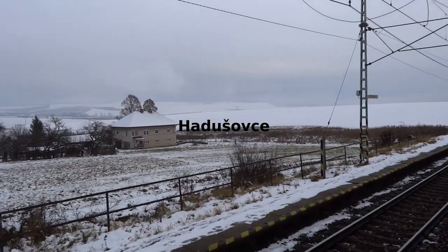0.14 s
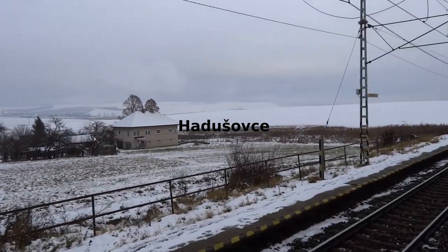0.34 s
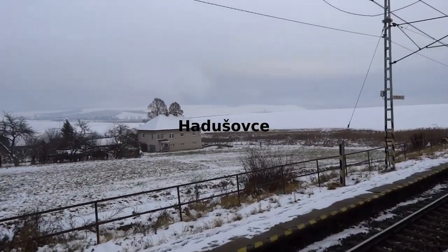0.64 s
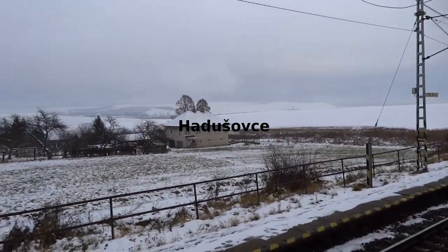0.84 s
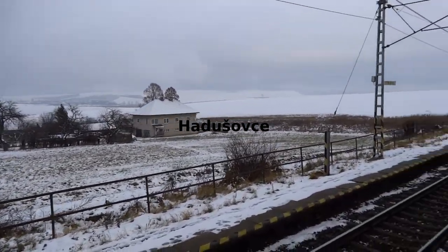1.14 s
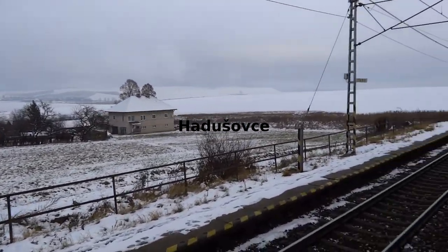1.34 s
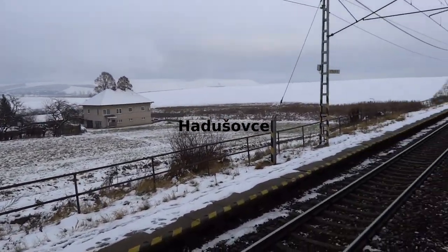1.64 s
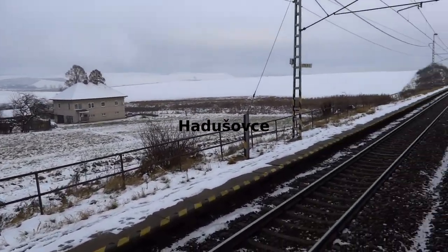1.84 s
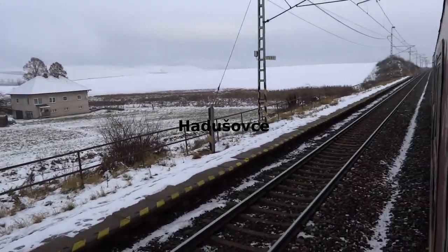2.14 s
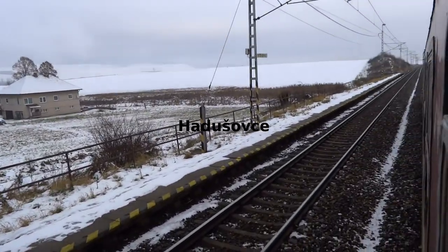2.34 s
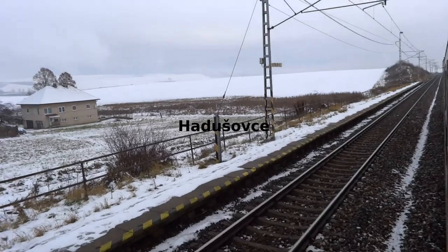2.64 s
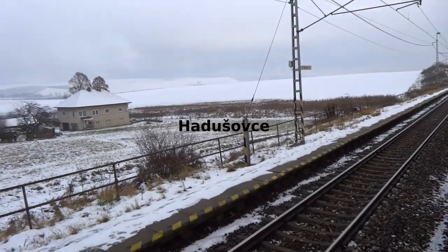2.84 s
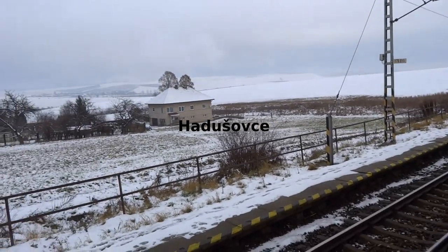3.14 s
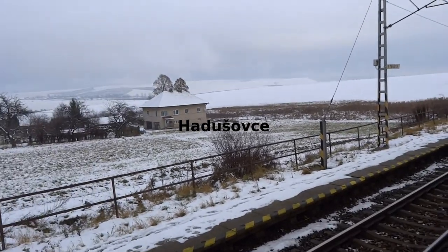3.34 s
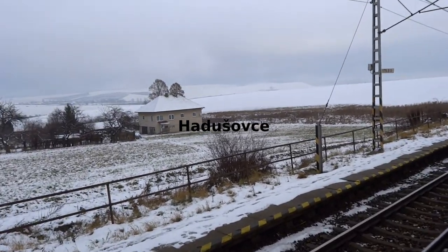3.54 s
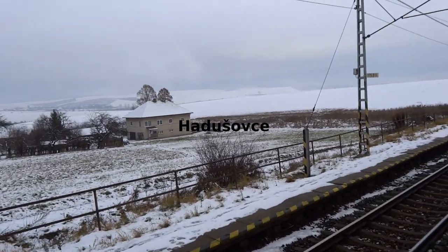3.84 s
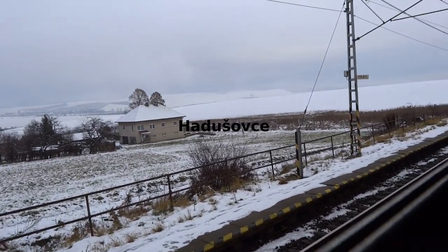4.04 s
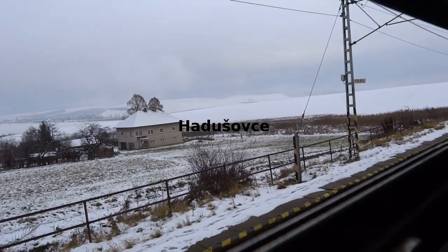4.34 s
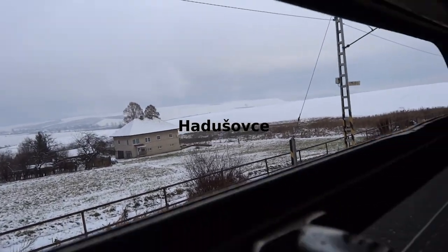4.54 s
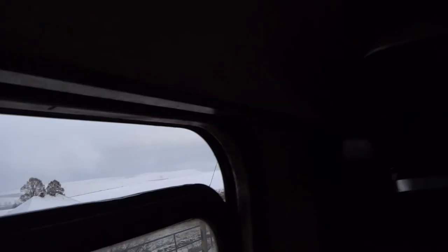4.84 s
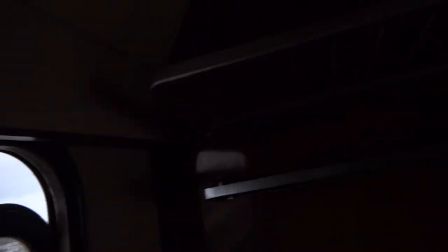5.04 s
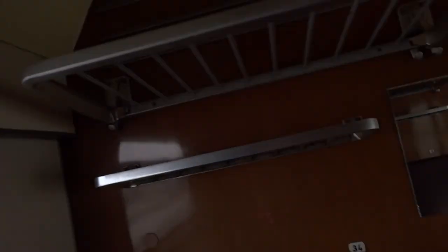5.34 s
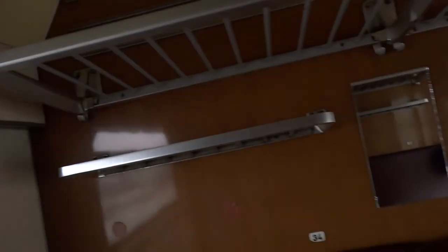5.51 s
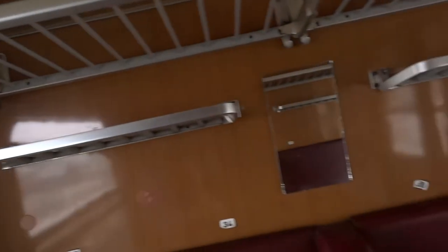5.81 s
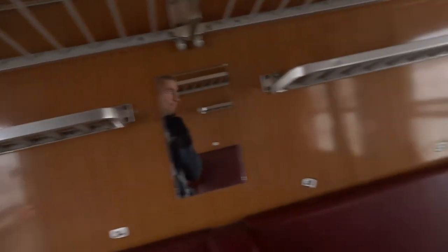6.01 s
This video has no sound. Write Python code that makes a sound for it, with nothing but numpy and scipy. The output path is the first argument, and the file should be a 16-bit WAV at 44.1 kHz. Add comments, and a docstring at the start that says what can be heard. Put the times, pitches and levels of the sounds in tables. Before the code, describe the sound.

A loud shrill brake squeal with grinding and groans breaks up as a train halts, followed by a bright air hiss, frame knock and faint murmur.

```python
"""Train wheels squeal under their brake blocks as a passenger train stops, heard from an open carriage window.
Friction drives beating wheel tones, which falter and break into pulses before the stop; noise and resonances
make the grinding, rough sliding tones the groans, and short gliding tones the cries of the blocks and brief
flares of the wheels. Then coloured noise and fluttering whistles make the compressed air hiss out of the
brakes, ringing modes knock on the window frame, and the compartment hums quietly."""
import sys
import numpy as np
from scipy import signal
from scipy.fft import rfft, irfft
from scipy.io import wavfile
from scipy.ndimage import uniform_filter1d, minimum_filter1d, map_coordinates

SR = 44100
rng = np.random.default_rng(int(sys.argv[2]) if len(sys.argv) > 2 else 0)


def waveform_to_disk(signal):
    """Save audio, clipped to [-1, 1], as 16-bit WAV at the path in sys.argv[1]."""
    frames = np.transpose(np.atleast_2d(signal))
    scaled = np.clip(frames, -1, 1) * 32767
    samples = np.round(scaled).astype(np.int16)
    wavfile.write(sys.argv[1], SR, samples)


N = 272097
TIME = np.arange(N) / SR
BINS = np.maximum(np.fft.rfftfreq(N, 1 / SR), 1)   # Hz

# The braking train. Each row: time in seconds, speed as a share of full speed.
SPEED = [(0, 0.94), (1, 0.71), (1.7, 0.41), (2.1, 0.23), (2.8, 0.111), (3.1, 0.048)]
STOP_S, STOP_FADE_S = 3.15, 0.043

# Pitch of the leading wheel mode. Each row: time in seconds, frequency in Hz.
SQUEAL_PITCH = [(0, 4725), (2, 4740), (2.6, 4733)]
# Its place shifts as the microphone turns. Each row: time in seconds, left minus right in dB.
SQUEAL_LEFT = [(0, 1.5), (1.3, 5.4), (2.2, 5), (2.8, 3)]
# Leading wheel mode, its octave, its twelfth (trimmed later) and the mode just below it.
# Each row: level at full speed in dB, level at a crawl in dB, release in seconds, fall in dB per second.
SQUEAL_MODES = [(-16.5, -12.5, 2.733, 109), (-41.5, -31, 2.79, 212), (-37, -39, 2.88, 120),
                (-18.5, -29.5, 2.75, 100)]
LOWER_HZ = 4499   # the wheel mode just below the leading one
# High wheel modes. Each entry: frequency in Hz.
WHISTLE_HZ = [8085, 9159, 10273, 12152]
# Their levels. Each row: level at full speed in dB, level at a crawl in dB, release in seconds,
# fall in dB per second, depth of the slow swing in dB.
WHISTLE_LEVELS = [(-52, -34, 2.27, 35, 1), (-73, -28, 2.21, 61, -10), (-47.5, -31.5, 2.65, 40, 0),
                  (-36, -54, 2.8, 31, 3)]
SWING_S, SWING_TOP_S = 0.402, 1.82   # period of the swing, and one of its tops
# Dips in the blocks' grip. Each row: centre in seconds, length in seconds, depth from 0 to 1.
FALTERS = [(0.026, 0.039, 0.32), (0.762, .025, 0.1), (0.799, 0.039, 0.65), (1.043, 0.02, 0.54),
           (1.131, 0.056, 0.6), (1.284, 0.13, 0.4), (1.438, 0.1, 0.48), (1.5, 0.035, 0.54),
           (1.57, 0.023, 0.71), (1.613, 0.036, 0.55), (1.656, 0.041, 0.17), (1.728, 0.066, 0.71),
           (1.793, 0.017, 0.7), (1.85, 0.075, 0.77), (2.009, 0.051, 0.73), (2.125, 0.043, 0.71),
           (2.25, 0.078, 0.89), (2.38, 0.16, 0.42), (2.447, 0.026, 0.46), (2.543, 0.067, 0.62),
           (2.688, 0.09, 0.76), (2.75, 0.063, 0.77), (2.822, 0.021, 0.68), (2.877, 0.018, 0.9),
           (2.95, 0.068, 0.8)]
UNREST_DB, UNREST_PER_S = 5, 20   # random swelling of the wheel modes

# Ringing of the brake rigging, before its trim. Each row: time in seconds, level in dB.
RINGING_LEVEL = [(0.0, -22), (0.24, -25.5), (0.57, -29), (0.61, -25), (0.77, -19.5), (0.89, -27.5),
                 (1.02, -21), (1.63, -31), (1.79, -30), (1.83, -26), (2.07, -31.5), (2.11, -25),
                 (2.52, -36), (2.64, -28), (2.68, -30.5), (2.85, -37.5), (3.12, -34.5)]
# Rasp of the blocks on the treads, before its trim. Each row: time in seconds, level in dB.
RASP_LEVEL = [(0.0, -33.5), (0.28, -37.5), (0.37, -33.5), (0.61, -36.5), (0.77, -33.5), (0.89, -37),
              (1.14, -36.5), (1.18, -36.5), (1.5, -34.5), (1.63, -37.5), (1.87, -32.5), (1.91, -37.5),
              (2.23, -35), (2.32, -37.5), (2.76, -38), (2.84, -38.5), (3.09, -40), (3.12, -44.5)]
RINGING_TRIM_DB, RASP_TRIM_DB = -6, 0.52
# Brake rigging resonances. Each row: frequency in Hz, width in Hz before narrowing, relative level in dB.
RIGGING = [(876, 27, -16.5), (1360, 56, -10.5), (2075, 52, -1), (2639, 43, 1.5), (3360, 37, 0.5),
           (3450, 72, -4), (3916, 70, -4), (4130, 130, -1.5)]
# Faint upper wheel resonances. Each row: frequency in Hz, width in Hz, relative level in dB.
SHIMMER = [(6070, 42, 0.5), (6795, 100, 1.5), (7300, 120, 2.5), (8050, 64, 0.5), (11560, 130, 2),
           (12100, 80, 1), (12540, 140, 4)]
# Colour of the rasp. Each row: frequency in Hz, relative level in dB.
RASP_COLOUR = [(300, -40), (700, 1), (1200, -6), (1800, 5.5), (3000, 7), (4300, 5), (5100, 9), (5900, 1),
               (7600, 1), (9500, 4), (11500, 2), (13500, -1), (15000, -2)]
# Colour of the wheels rolling. Each row: frequency in Hz, relative level in dB.
ROLLING_COLOUR = [(30, -56), (100, -50), (160, -58), (260, 0), (400, 1), (560, -2.5), (750, -5.5),
                  (1200, 3), (3000, -66)]
ROLL_DB, ROLL_SPEED_DB = -57, 7.5   # roll at a standstill, and its rise up to full speed

# Low groans, before their trim. Each row: time in seconds, level in dB.
GROAN_LEVEL = [(0, -40), (1.2, -42), (1.7, -38), (2.2, -38), (2.7, -37), (3.0, -45.5)]
GROAN_TRIM_DB = -5
# Modes of the groans. Each row: frequency in Hz, relative level in dB.
GROAN_MODES = [(340, -5), (480, 0.5), (660, -1.5), (895, 10.5), (1030, 6), (1400, 1.5), (1700, 4),
               (2030, 3.5)]
# Single blocks catch and cry out, and wheel modes flare briefly. Each row: start in seconds, length in seconds,
# middle pitch in Hz, # glide from start to end in Hz, level in dB.
CRIES = [(0, 0.07, 3500, 8, -32), (0, 0.09, 817, -14, -42), (.02, 0.15, 2083, 6, -37),
         (.03, 0.12, 2650, 0, -35), (0.156, 0.061, 816, -3, -33), (.18, .07, 3890, 0, -30),
         (0.272, 0.056, 2633, 0, -27.5), (0.32, 0.4, 825, 7, -32), (.4, .26, 5540, 0, -39),
         (0.47, 0.15, 3910, 13, -26), (0.46, 0.14, 3100, -6, -35), (0.61, 0.068, 9500, -3, -27),
         (0.641, .045, 3915, 0, -29), (0.738, 0.043, 2092, 2, -29.5), (0.71, 0.046, 3455, 0, -25),
         (0.738, 0.13, 3370, -21, -28), (0.77, 0.14, 827, -23, -33), (0.789, 0.08, 3080, -10, -31),
         (0.925, 0.13, 12100, -5, -29), (.98, 0.22, 2666, 3, -31.5), (1.054, 0.16, 2087, -11, -31.5),
         (1.018, 0.055, 3370, -2, -39), (1.111, 0.1, 6160, -15, -33), (1.159, 0.038, 8060, -9, -28.5),
         (1.289, 0.054, 2080, -2, -31), (1.512, 0.077, 2100, -2, -29), (1.62, 0.31, 9490, -2.5, -23.5),
         (1.66, 0.097, 1365, 6, -39), (1.696, 0.078, 6200, -3, -33), (1.737, 0.023, 2620, -2, -22),
         (1.725, 0.043, 3345, 0, -33), (1.799, 0.077, 2612, 0, -26), (1.828, 0.036, 8020, 4, -24),
         (1.827, .05, 2088, 0, -32), (1.825, 0.045, 1435, -60, -35), (1.84, 0.072, 852, 0, -35.5),
         (1.95, 0.073, 866, 12, -33.5), (2.026, 0.076, 546, -36, -40), (2.102, 0.062, 1450, 15, -38),
         (2.126, 0.065, 1960, -30, -34), (2.14, 0.076, 12000, 0, -28), (2.199, 0.058, 3360, -30, -34),
         (2.19, 0.1, 4090, -10, -33), (2.19, 0.056, 815, -40, -36), (2.24, 0.12, 2070, 30, -51),
         (2.24, 0.23, 9630, 10, -40), (2.25, 0.12, 9100, 0, -32), (2.27, 0.13, 2660, -15, -33),
         (2.321, 0.053, 1187, 23, -39.5), (2.351, 0.067, 935, -34, -27.5), (2.361, 0.061, 1880, -20, -26.5),
         (2.35, 0.059, 3990, -15, -30), (2.413, 0.063, 864, -33, -34.5), (2.434, 0.042, 2530, -22, -31),
         (2.444, 0.04, 1720, -20, -36), (2.56, 0.11, 2564, -3, -29), (2.563, 0.065, 4400, 0, -31),
         (2.532, 0.099, 7270, 9.5, -31.5), (2.575, 0.11, 2180, 5, -33.5), (2.544, 0.21, 1328, 14, -39),
         (2.69, 0.09, 775, 27, -41), (2.663, 0.11, 8740, 8, -39), (2.684, 0.091, 3975, -10, -38),
         (2.705, 0.069, 4490, -5, -18.5), (2.723, 0.11, 9490, -8, -31), (2.735, 0.078, 1505, 0, -40),
         (2.859, 0.082, 910, 11, -34), (2.865, 0.068, 1840, 34, -36), (3.127, 0.25, 4540, 2, -47.5)]

# Bumps of the running gear. Each row: start in seconds, length in seconds, level in dB.
BUMPS = [(0, 0.062, -55), (.2, 0.09, -59), (.32, 0.14, -53), (.5, 0.082, -52), (.74, 0.12, -60),
         (1.18, 0.12, -58), (1.63, 0.071, -58)]
# Colour of the bumps. Each row: frequency in Hz, relative level in dB.
BUMP_COLOUR = [(25, -30), (70, -8), (120, -8), (160, 3), (220, 2), (300, -27), (500, -32), (1500, -52)]
# The coach settles on its springs. Each row: start in seconds, length in seconds, level in dB.
SETTLE = [(3.06, 0.15, -54), (3.17, 0.16, -50.5)]
# Colour of the settling. Each row: frequency in Hz, relative level in dB.
SETTLE_COLOUR = [(25, -32), (70, -9), (130, -17), (270, -5), (400, -8.5), (1500, -25.5)]

# Pipe tone, jet and finest spray of the air. Each row: top level in dB, swell up to the top in dB,
# sag in dB per second, seep before in dB, seep after in dB.
AIR_PARTS = [(-36, 2.5, 11, -53.5, -53.5), (-35, 14.5, 2, -56, -49.5), (-36, 7, 10.5, -54, -60)]
VALVE_OPEN_S, VALVE_ATTACK_S, VALVE_TOP_S = 3.47, 0.08, 3.85
VALVE_CLOSE_S, VALVE_FALL_DB_PER_S = 4.577, 31
# Colour of the pipe tone. Each row: frequency in Hz, relative level in dB.
PIPE_COLOUR = [(280, -35), (420, -7), (640, -9), (850, -36), (1280, -43), (1550, -8.5), (1750, -5),
               (2300, -2.5), (2900, 5), (3600, 3), (4300, 4.5), (4900, -2.5), (5800, -8), (8000, -59)]
# Colour of the jet. Each row: frequency in Hz, relative level in dB.
JET_COLOUR = [(3000, -20), (4600, 2), (5400, -3), (7200, 6), (7600, 0.5), (8500, 6), (10000, 5.5),
              (11200, 5), (12500, -19), (15000, -7.5)]
# Colour of the spray. Each row: frequency in Hz, relative level in dB.
SPRAY_COLOUR = [(9000, -51), (11000, 8), (12000, 2), (13500, 9), (14500, 0), (15300, -2)]
# Air pipe resonances. Each row: frequency in Hz, width in Hz, lift in dB.
AIR_PEAKS = [(1811, 170, 15), (3076, 230, 7.5), (3220, 54, 6), (4460, 120, 3.5), (5500, 190, 6),
             (6630, 180, 6.5), (9920, 250, 8), (12400, 500, 10)]
# The microphone draws back from the window. Each row: time in seconds, share inside from 0 to 1.
INSIDE = [(4.5, 0), (5.2, 1)]
# How the compartment colours the hiss. Each row: frequency in Hz, gain in dB.
COMPARTMENT = [(1500, 5.5), (2400, 6), (3000, 2), (3300, -0.5), (3600, -1), (4300, 5.5), (5050, -2),
               (5480, 9), (6000, 5), (7000, 2.5), (10000, -2.5), (13500, 4.5)]
# Half-whistles in the escaping air. Each row: start in seconds, length in seconds, pitch in Hz, level in dB.
AIR_WHISTLES = [(3.483, 0.083, 2970, -37.5), (3.55, 0.65, 4020, -47), (3.615, 0.51, 3020, -37),
                (3.76, .22, 4250, -42), (4.222, .42, 4450, -46.5)]
AIR_FLUTTER_PER_S = 70
# A thin leak as the train comes to rest. Each row: start in seconds, length in seconds, level in dB.
LEAK = [(2.95, 0.6, -48.5)]
# Colour of the leak. Each row: frequency in Hz, relative level in dB.
LEAK_COLOUR = [(1000, -17), (2000, -22), (2600, -4.5), (3000, -11), (3600, -19), (6000, -38)]

# Contacts on the window frame. Each row: time in seconds, strength in dB.
KNOCKS = [(4.2109, -30), (4.2132, -18.5), (4.2152, -29.5), (4.2168, -30), (5.281, -46), (5.295, -48)]
# Window frame modes. Each row: frequency in Hz, level in dB, time to decay by 60 dB in seconds.
FRAME = [(197, -22, 0.14), (400, -15, 0.014), (600, -13.5, 0.016), (790, -11.5, 0.018), (1070, -5.5, 0.012),
         (1410, 3, 0.008), (1625, 1.5, 0.024), (2260, -5, 0.01), (3140, -5, .01), (4240, 0.5, 0.0074),
         (6700, 4, 0.0037), (9400, -3, .005)]
ROOM_T60_S, ROOM_DB, ROOM_DULL_HZ = 0.26, 2.5, 1050
# A sleeve brushes the frame. Each row: start in seconds, length in seconds, level in dB.
BRUSH = [(5.275, 0.067, -49)]
# Colour of the brushing. Each row: frequency in Hz, relative level in dB.
BRUSH_COLOUR = [(120, -17), (300, -5), (600, 0), (1500, -6), (3500, -12), (9000, -24)]

# Murmur of the standing carriage, before its trim. Each row: time in seconds, level in dB.
VENT_LEVEL = [(3.2, -57.5), (3.5, -49.5), (3.85, -67), (4.6, -54.5), (5.2, -50), (6.17, -47)]
VENT_TRIM_DB = 3
# Colour of the murmur. Each row: frequency in Hz, relative level in dB.
VENT_COLOUR = [(60, -32), (170, -3), (300, -5), (550, -3), (900, -7.5), (1400, -10.5), (2000, -16.5),
               (4000, -7)]
# Hum lines. Each row: frequency in Hz, relative level in dB.
HUM = [(121, -8), (139, -5)]
# Colour of the rumble. Each row: frequency in Hz, relative level in dB.
RUMBLE_COLOUR = [(15, 6), (30, -6), (60, -14), (100, -3), (200, -24), (600, -60)]

CEILING_DB, CUTOFF_HZ = -5.5, 15400   # limiter ceiling and top of the band


def from_db(db):
    """Decibels to gain."""
    return 10 ** (np.asarray(db) / 20)


def rms_one(x):
    """Scale to unit power."""
    return x / np.sqrt(np.mean(np.abs(x) ** 2) + 1e-20)


def in_time(rows):
    """The second column of a curve, sample by sample."""
    seconds, values = np.transpose(rows)
    return np.interp(TIME, seconds, values)


def swell(start, length, t=TIME):
    """A rounded rise and fall."""
    return np.sqrt(np.abs(np.sin(np.pi * np.clip((t - start) / length, 0, 1))))


def pan(left_db):
    """Gains of the two channels from left minus right in dB."""
    return from_db(np.array([[.5], [-.5]]) * left_db)


def wander(rate, clock=TIME):
    """Smooth chance with a new value `rate` times per unit of the clock; spread 1."""
    knots = rng.standard_normal(size=8192)
    samples = np.arange(len(clock))
    coarse = map_coordinates(knots, [clock[::10] * rate], order=3, mode="wrap")
    return rms_one(np.interp(samples, samples[::10], coarse))


def colour(points, peaks=()):
    """Gain per frequency: a smooth slope lifted by resonances."""
    hz, db = np.transpose(points)
    lift = sum(lift_db / (1 + (2 * (BINS - f) / width) ** 2) for f, width, lift_db in peaks)
    return from_db(np.interp(np.log(BINS), np.log(hz), db) + lift)


def noise(gain, side_db):
    """Coloured noise at two close microphones."""
    mid, side = irfft(rfft(rng.standard_normal((2, N))) * gain, N)
    return rms_one(mid + from_db(side_db) * side * np.array([[1], [-1]]))


def resonance(hz, width):
    """A mode kept ringing at random: a narrow band of noise."""
    return noise(1 / (1 + ((BINS - hz) / width) ** 2), side_db=-12.0)


def surges(rows, points):
    """Noise of one colour that comes in swells."""
    level = sum(from_db(db) * swell(start, length) for start, length, db in rows)
    return level * noise(colour(points), side_db=-12)


def wheel_tone(hz, travel, flutter_hz, scatter, side_db, width_hz=300):
    """One mode sung by several turning wheels: a steady core, and side tones that beat as fast as they turn."""
    def beating(rate):
        """Random swing in level and phase, paced by the distance rolled."""
        return (wander(rate, travel) + 1j * wander(rate, travel)) / np.sqrt(2)

    mid = 1 + scatter * (beating(flutter_hz) + 0.54 * beating(3 * flutter_hz))
    # friction holds the mean swing steady
    mid = mid / np.sqrt(uniform_filter1d(np.abs(mid) ** 2, size=1700) + 0.37)
    both = mid + from_db(side_db) * beating(flutter_hz) * np.array([[1], [-1]])
    # and caps the widest swings
    both = both / (1 + (np.abs(both) / 1.3) ** 4) ** .25
    # steel cannot follow faster changes
    slow = signal.butter(3, width_hz / 2, fs=SR, output="sos")
    both = rms_one(signal.sosfilt(slow, both))
    carrier = np.exp(2j * np.pi * np.cumsum(hz + 0 * TIME) / SR)
    return np.sqrt(2) * np.real(both * carrier)


def mode_level(speed, fast_db, slow_db, release_s, fall_db_per_s):
    """A wheel mode's level in dB: it follows the speed, and falls away steadily once released."""
    return slow_db + (fast_db - slow_db) * speed - fall_db_per_s * np.maximum(TIME - release_s, 0)


def unrest():
    """A gain that drifts as a block's grip changes."""
    return from_db(UNREST_DB * np.clip(wander(UNREST_PER_S), -3, 1))


def grip(speed):
    """The blocks' hold on the wheels, shared by both loud modes: it shivers most at speed, and falters."""
    hold = from_db((.8 + 1.9 * speed) * np.clip(wander(60), -3, .8))
    for centre, length, depth in FALTERS:
        near = np.abs(TIME - centre) < 2 * length
        hold[near] *= 1 - depth * np.exp(-(2 * (TIME[near] - centre) / length) ** 2)
    return hold


def squeal(speed, travel, moving):
    """Stick-slip drives the wheel modes; they grow purer as the train slows, then lose their drive and die away."""
    pitch = in_time(SQUEAL_PITCH)
    main_db, octave_db, twelfth_db, lower_db = (mode_level(speed, *row) for row in SQUEAL_MODES)
    swing = np.cos(2 * np.pi * (TIME - SWING_TOP_S) / SWING_S)
    scatter, loud_scatter = 1.0 + 2.0 * speed, .2 + 1.1 * speed
    jitter_hz = (2 + 5 * speed) * wander(35)

    leading = wheel_tone(pitch + jitter_hz, travel, flutter_hz=111.8, scatter=loud_scatter,
                         side_db=-19.0, width_hz=172)
    lower = wheel_tone(LOWER_HZ, travel, flutter_hz=99.3, scatter=loud_scatter, side_db=-6, width_hz=164)
    loud = from_db(main_db) * leading * pan(in_time(SQUEAL_LEFT))
    loud += from_db(lower_db) * unrest() * lower * pan(8.4)

    octave = wheel_tone(2 * pitch, travel, flutter_hz=121.6, scatter=scatter, side_db=-14.5)
    twelfth = wheel_tone(3 * pitch, travel, flutter_hz=150, scatter=2 * scatter, side_db=-11)
    high = from_db(octave_db) * unrest() * octave
    high += from_db(twelfth_db - 1.5) * unrest() * twelfth
    high *= moving
    for hz, row, spread in zip(WHISTLE_HZ, WHISTLE_LEVELS, [13.0, 2.2, 6.2, 0.73]):
        *levels, swing_db = row
        whistle_db = mode_level(speed, *levels) + swing_db * swing
        whistle = wheel_tone(hz, travel, flutter_hz=167.2, scatter=spread * scatter, side_db=-21)
        high += from_db(whistle_db) * unrest() * whistle
    return (loud * grip(speed) + high) * np.interp(TIME, [3.3, 3.48], [1, 0])


def wobble(x, share, rate):
    """Changing contact pressure bends the pitch by a small share."""
    clock = np.arange(N) + np.cumsum(share * wander(rate))
    return np.array([np.interp(clock, np.arange(N), channel) for channel in x])


def grinding(speed, moving):
    """The blocks rasp on the treads and shake the rigging, each resonance in its own fits, over the wheels' roll."""
    rigging = 0
    for hz, width, db in RIGGING:
        mode = wobble(resonance(hz, 0.7 * width), share=.008, rate=14)
        rigging = rigging + from_db(db + 3.33 * wander(20)) * mode
    ringing = from_db(in_time(RINGING_LEVEL) + RINGING_TRIM_DB) * rms_one(rigging) * pan(3.4)

    shimmer = sum(from_db(db + 6.3 * np.tanh(wander(20))) * resonance(hz, width) for hz, width, db in SHIMMER)
    grain = from_db(1.3 * wander(110) + .8 * wander(18))
    rasp = from_db(5.0) * grain * noise(colour(RASP_COLOUR), side_db=-8.0)
    rasp = rasp + from_db(-1.5) * rms_one(shimmer)
    rasp = from_db(in_time(RASP_LEVEL) + RASP_TRIM_DB) * rasp

    roll_db = ROLL_DB + ROLL_SPEED_DB * speed + 3.2 * wander(25.23)
    roll = from_db(roll_db) * noise(colour(ROLLING_COLOUR), side_db=-6.5) * pan(-2.6)
    return (ringing + rasp + roll) * moving


def groans(moving):
    """Low groans of the blocks: eight rough tones at once, each swelling and sliding at random."""
    out = 0
    for hz, db in GROAN_MODES:
        pitch = hz * (1 + .022 * wander(11)) + 45 * wander(220)
        swell_db = 8 * np.tanh(wander(22)) + 2.5 * wander(150)
        out = out + from_db(db + swell_db) * np.sin(2 * np.pi * np.cumsum(pitch) / SR)
    return from_db(in_time(GROAN_LEVEL) + GROAN_TRIM_DB) * rms_one(out) * moving * pan(0.62)


def cries(speed):
    """Short gliding tones from single blocks and brief flares of wheel modes: rough at speed, purer at a crawl."""
    out = np.zeros(N)
    for start, length, hz, glide_hz, db in CRIES:
        during = (TIME >= start) & (TIME < start + length)
        t = TIME[during]
        unsteady = np.sqrt(speed[during])
        rough_hz = min(.013 * hz, 24) * unsteady * wander(110, t)
        flutter_db = (2 + 3 * unsteady) * np.tanh(wander(70, t))
        pitch = hz + glide_hz * ((t - start) / length - .5) + rough_hz
        tone = np.sin(2 * np.pi * np.cumsum(pitch) / SR)
        out[during] += from_db(db + flutter_db) * swell(start, length, t) * tone
    return out * pan(2.5)


def bumps():
    """The running gear bumps: short swells of low noise."""
    return surges(BUMPS, BUMP_COLOUR)


def settling():
    """The coach settles on its springs with two dull swells of noise."""
    return surges(SETTLE, SETTLE_COLOUR)


def air_level(top_db, swell_db, sag_db_per_s, before_db, after_db):
    """The valve's burst over a seep, in dB: it swells, sags as the pressure drains, and is shut down."""
    opened = .5 + .5 * np.tanh((TIME - VALVE_OPEN_S) / VALVE_ATTACK_S)
    burst_db = top_db - np.interp(TIME, [VALVE_OPEN_S, VALVE_TOP_S], [swell_db, 0])
    burst_db -= sag_db_per_s * np.maximum(TIME - VALVE_TOP_S, 0)
    burst_db -= VALVE_FALL_DB_PER_S * np.maximum(TIME - VALVE_CLOSE_S, 0)
    seep_db = before_db + (after_db - before_db) * opened
    return 20 * np.log10(np.hypot(opened * from_db(burst_db), from_db(seep_db)))


def air_release():
    """A jet of escaping air, coloured by the pipes it leaves through; pipe tone and spray sag faster than the jet."""
    pipe_db, jet_db, spray_db = (air_level(*row) for row in AIR_PARTS)
    # echoes from the underframe comb the hiss
    lags_s = rng.uniform(0.0028, 0.02, size=6)
    echoes = 1 + sum(0.32 * np.exp(-2j * np.pi * BINS * lag) for lag in lags_s)
    pipe = from_db(pipe_db) * noise(colour(PIPE_COLOUR, AIR_PEAKS) * echoes, side_db=-11.5) * pan(-0.61)
    jet = from_db(jet_db) * noise(colour(JET_COLOUR, AIR_PEAKS) * echoes, side_db=-12.5)
    spray = from_db(spray_db) * noise(colour(SPRAY_COLOUR, AIR_PEAKS) * echoes, side_db=-13.5)
    return pipe + jet + spray


def drawn_inside(hiss):
    """The hiss takes on the colour of the compartment as the microphone leaves the window."""
    inside = in_time(INSIDE)
    return (1 - inside) * hiss + inside * irfft(rfft(hiss) * colour(COMPARTMENT), N)


def air_whistles():
    """Narrow fluttering half-whistles, several overlapping, sound in the escaping air."""
    out = 0
    for start, length, hz, db in AIR_WHISTLES:
        flutter = rms_one(wander(AIR_FLUTTER_PER_S) + 1j * wander(AIR_FLUTTER_PER_S))
        pitch = hz + 14 * wander(16)
        tone = np.real(flutter * np.exp(2j * np.pi * np.cumsum(pitch) / SR))
        out = out + from_db(db) * swell(start, length) * tone
    return out * pan(-1.0)


def leak():
    """A thin leak of air: one swell of coloured noise."""
    return surges(LEAK, LEAK_COLOUR)


def knocks():
    """Each contact rings the window frame; the compartment adds a short, dull tail."""
    out = np.zeros(N)
    at = [round(s * SR) for s, db in KNOCKS]
    contact_db = np.array(KNOCKS)[:, 1]
    for k, (hz, mode_db, t60) in enumerate(FRAME):
        clicks = np.full(N, 1e-18)
        clicks[at] = from_db(contact_db + mode_db + rng.normal(0, 1, len(at)))
        r = from_db(-60 / (t60 * SR))   # decay per sample
        w = 2 * np.pi * hz / SR
        out += (-1) ** k * signal.lfilter([0, np.sin(w)], [1, -2 * r * np.cos(w), r * r], clicks)
    # the frame is too small to give bass
    out = signal.sosfilt(signal.butter(2, 130, "high", fs=SR, output="sos"), out)

    age = TIME[:SR // 2]
    tail = rng.standard_normal((2, len(age))) * from_db(-60 * age / ROOM_T60_S)
    tail /= np.sqrt(np.sum(tail ** 2, axis=1, keepdims=True))
    # seats soak up the treble
    tail = signal.sosfilt(signal.butter(2, ROOM_DULL_HZ, fs=SR, output="sos"), tail)
    room = signal.fftconvolve(out[None], tail, axes=1)[:, :N]
    return out * pan(-0.92) + from_db(ROOM_DB) * room


def sleeve_brush():
    """A sleeve brushes the frame: a brief swell of soft noise."""
    return surges(BRUSH, BRUSH_COLOUR)


def rise(start_db, end_db, middle_s, length_s):
    """A level in dB that moves from one value to another."""
    return start_db + (end_db - start_db) * np.clip((TIME - middle_s) / length_s + .5, 0, 1)


def carriage():
    """Ventilation, a wavering hum and a faint rumble in the standing coach; hum and rumble come up indoors."""
    vent = from_db(in_time(VENT_LEVEL) + VENT_TRIM_DB) * noise(colour(VENT_COLOUR), side_db=-7)
    hum_db = rise(start_db=-90, end_db=-67.5, middle_s=4.38, length_s=0.39)
    hum = sum(from_db(db) * resonance(hz, width=3.1) for hz, db in HUM)
    rumble_db = rise(start_db=-85, end_db=-66.5, middle_s=4.7, length_s=.2)
    rumble = noise(colour(RUMBLE_COLOUR), side_db=-16)
    return vent + from_db(hum_db) * rms_one(hum) + from_db(rumble_db) * rumble


def scene():
    """Braking gives way to the sounds of the standing train."""
    speed = in_time(SPEED)
    travel = np.cumsum(speed) / SR
    moving = .5 - .5 * np.tanh((TIME - STOP_S) / STOP_FADE_S)
    at_rest = np.sqrt(1 - moving ** 2)
    brakes = squeal(speed, travel, moving) + grinding(speed, moving) + groans(moving) + cries(speed)
    body = bumps() + settling()
    standing = (drawn_inside(air_release()) + air_whistles() + carriage()) * at_rest
    return brakes + body + standing + leak() + knocks() + sleeve_brush()


def record(dry):
    """A fast limiter holds the peaks down, and the top is cut steeply."""
    allowed = np.minimum(1, from_db(CEILING_DB) / (np.abs(dry).max(axis=0) + 1e-9))
    gain = uniform_filter1d(minimum_filter1d(allowed, size=181), size=181)
    top_cut = signal.ellip(10, .2, 90, CUTOFF_HZ, fs=SR, output="sos")
    return signal.sosfilt(top_cut, gain * dry)


dry = scene()
out = record(dry)
waveform_to_disk(out)
```